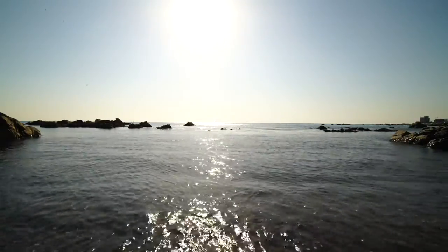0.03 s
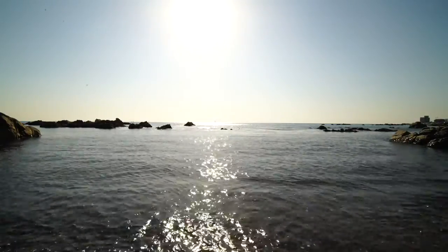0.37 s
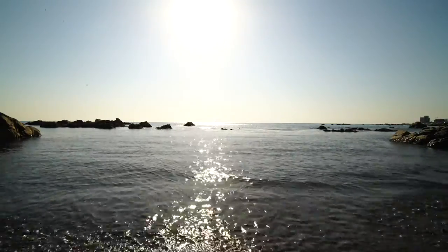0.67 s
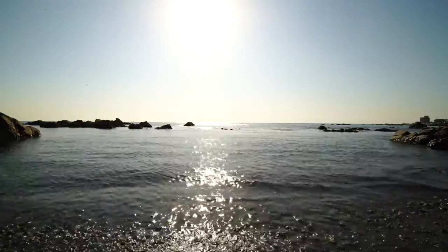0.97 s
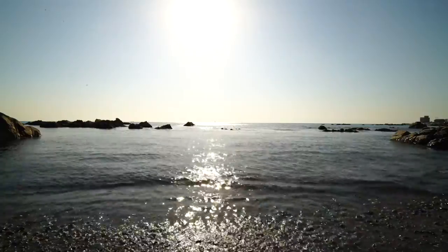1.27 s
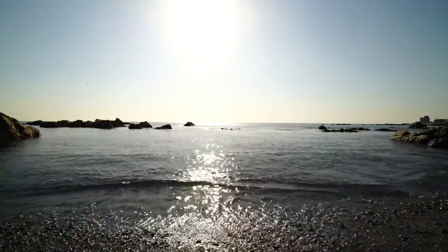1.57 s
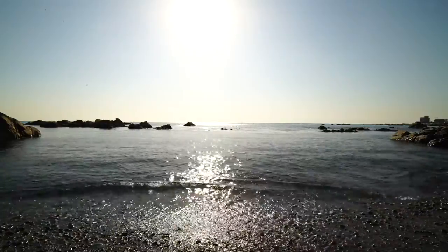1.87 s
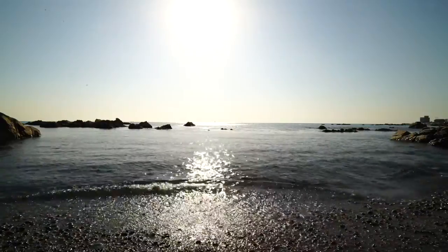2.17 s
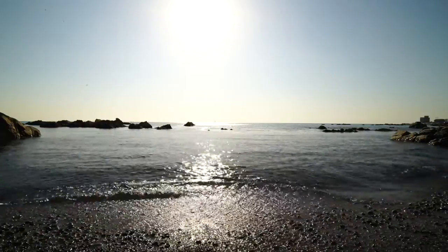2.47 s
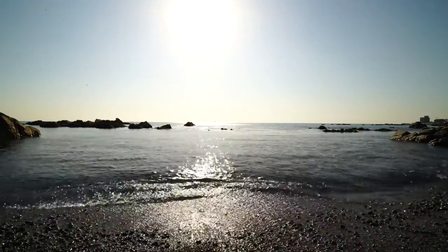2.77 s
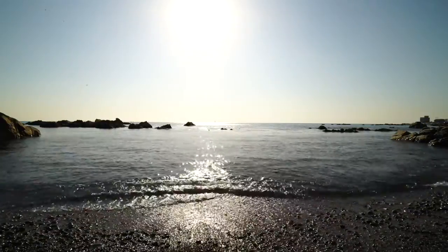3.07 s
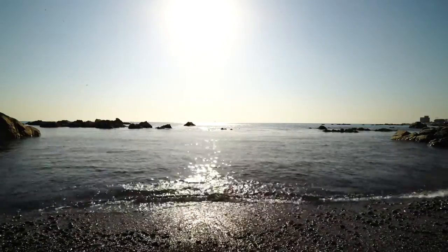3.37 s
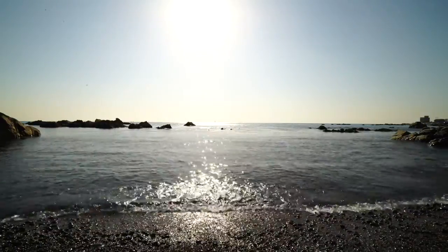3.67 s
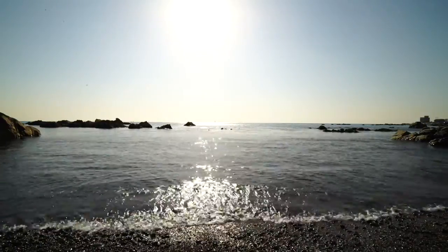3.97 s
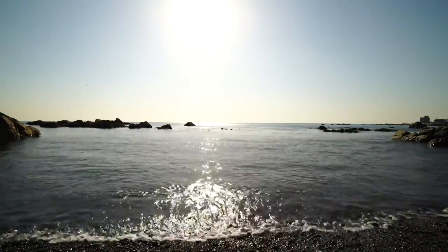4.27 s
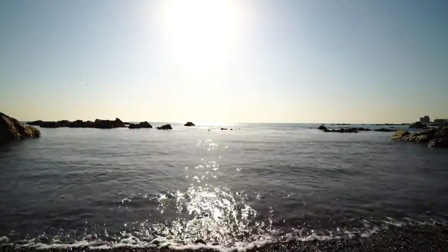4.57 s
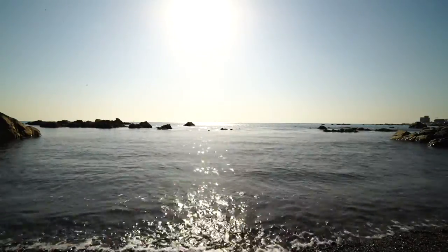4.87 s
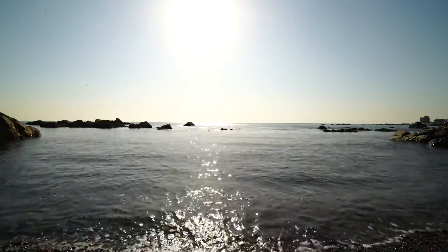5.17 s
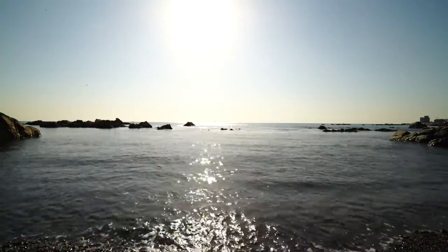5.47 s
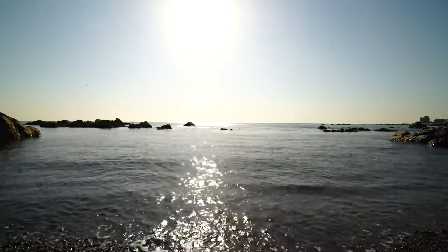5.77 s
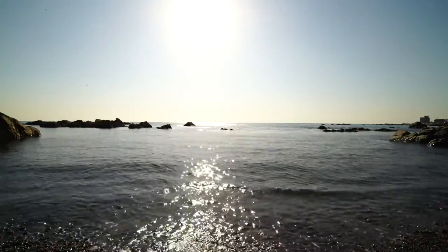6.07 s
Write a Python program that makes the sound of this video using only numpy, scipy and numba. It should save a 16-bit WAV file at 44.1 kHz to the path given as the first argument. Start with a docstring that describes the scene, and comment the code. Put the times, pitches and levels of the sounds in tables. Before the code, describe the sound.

Wind gusts rumble and thump on an outdoor microphone at the edge of a pebble shore, over the steady wash of the sea. A small wave spills faintly, then gurgles build and the next one breaks close by, running up the stones with a foamy hiss. A few pebbles click and bubbles plop. The water drains away softly, and the wind buffets harder at the end.

```python
"""Gusts rumble on the microphone over the wash of the open sea, while small waves reach a pebble shore.
One spills faintly in the distance; the next breaks close by and runs up the stones. The water sounds
by bubble resonance: each pocket of air is a damped oscillator, from deep gulps to the fizz of foam.
Pebbles tick as impacts excite their modes. Wind pops the microphone, and its hardest pushes drive
a limiter."""
import sys
import numpy as np
from scipy import signal
from scipy.fft import rfft, irfft, next_fast_len
from scipy.io import wavfile
from scipy.ndimage import uniform_filter1d, minimum_filter1d
from numba import njit

SR = 44100
rng = np.random.default_rng(int(sys.argv[2]) if len(sys.argv) > 2 else 0)


def transcribe(signal):
    """Save signal, clipped to [-1, 1], as a 16-bit WAV file at the path in sys.argv[1]."""
    frames = np.atleast_2d(signal).T
    limited = np.clip(frames, -1, 1)
    pcm = np.round(limited * 32767).astype(np.int16)
    wavfile.write(sys.argv[1], SR, pcm)


N = 274302

# sea wash and foam hiss as coloured by the microphone, bright near 8 kHz and duller above 10 kHz
# (frequency [Hz], relative density [dB])
SEA_AT_MICROPHONE = [(130, -5), (230, -4), (430, -3.5), (750, -1.5), (1200, -3.5), (2400, -5.5), (4000, -7),
                     (6200, -11.5), (8300, -7), (9400, -11.5), (10600, -17), (13600, -16), (15500, -16)]
FOAM_AT_MICROPHONE = [(2800, -1), (4300, -1), (5200, -1.5), (6300, -3), (8400, -1.5), (9400, -6),
                      (10500, -13.5), (13500, -9.5), (15500, -8.5)]
# spectra of wind and of three bubble sizes (frequency [Hz], relative density [dB])
EDDY_SPECTRUM = [(7, -0.5), (13, 12.5), (24, 2), (36, -8.5), (50, -19.5), (80, -44), (150, -62)]
FLUTTER_SPECTRUM = [(28, -13), (45, 2), (60, 3.5), (75, -7), (100, -10), (150, -19.5), (220, -26),
                    (400, -38), (900, -66)]
PLUNGE_SPECTRUM = [(130, -25), (210, 2.5), (320, 3.5), (520, 5), (680, 1), (1000, -52)]
SPLASH_SPECTRUM = [(350, -16), (540, -6), (700, 0.5), (1000, 2.5), (1430, 1.5), (1720, -3), (2500, -63)]
SWASH_SPECTRUM = [(900, -3.5), (1350, -4.5), (1650, -1), (2400, -1), (3300, -5), (4300, -12), (6000, -20.5),
                  (9000, -34)]
# gusts (start [s], hold [s], eddy level [dB], flutter level [dB])
WIND_GUSTS = [(0, 0.39, -12.5, -27.5), (.52, 0.19, -10.5, -31), (0.776, 0.21, -5, -25.5),
              (1.3, 0.15, -8, -30), (1.52, 0.11, -13.5, -40), (2.066, 0.23, -14.5, -38),
              (2.35, 0.24, -9.5, -33.5), (2.998, 0.26, -14.5, -41), (3.943, 0.73, -13, -30),
              (4.85, 0.44, -20, -32.5), (5.485, 0.054, -15, -30), (5.742, .13, -5.5, -23.5),
              (6.011, 0.17, -3, -18.5)]
# hardest pushes of wind (time [s], pressure over full scale [dB], half-width [s])
PRESSURE_PULSES = [(0.801, 3, 0.008), (0.935, 4.5, 0.012), (1.453, 3.5, 0.016), (4.53, 6.5, 0.019),
                   (6.006, 2.5, 0.01), (6.164, 3, 0.011)]
# pebbles knocked together (time [s], main mode frequency [Hz], main mode level [dB])
PEBBLE_IMPACTS = [(0.537, 2590, -26), (.901, 3900, -29.5), (1.969, 8150, -28), (2.206, 3350, -22),
                  (2.714, 11700, -30), (3.200, 2860, -12), (3.682, 8000, -19), (4.201, 9100, -30),
                  (4.364, 7300, -27), (5.346, 11000, -38)]
# the two rows at 1.4 s are a short pop of wind overloading the microphone; the others are single bubbles
# (time [s], frequency [Hz], level [dB], 60 dB decay time [s])
PLOPS_AND_WIND_POP = [(1.266, 2700, -24, 0.01), (1.401, 870, -26, 0.015), (1.402, 360, -28, .06),
                      (1.593, 1990, -24.5, 0.023), (1.675, 437, -32.5, 0.091), (2.0, 496, -30.5, .12),
                      (2.392, 430, -34, .08), (2.436, 390, -28.5, 0.18), (2.683, 442, -27.5, 0.12),
                      (2.802, 501, -22, .13), (2.825, 670, -24.5, .11), (2.84, 236, -34.5, .15),
                      (2.858, 538, -27, 0.16), (3.094, 910, -15.5, .055), (3.249, 2300, -17, .022),
                      (3.2767, 1350, -10.5, .026), (3.362, 618, -25, .1), (3.625, 250, -22.5, 0.083),
                      (3.732, 855, -18, .11), (3.743, 1356, -16.5, 0.065), (3.977, 1025, -10.5, 0.022),
                      (4.190, 1166, -22, 0.081), (4.455, 2520, -17.5, 0.023), (4.581, 1300, -18.5, 0.038),
                      (4.619, 1900, -23, .04), (5.524, 319, -32.5, 0.19)]
# breaking crests (time [s], strength [dB])
CRESTS = [(1.98, -37.5), (2.84, -35), (3.55, -24.5), (4.45, -40.5), (5.84, -41.5)]
# response of each bubble size to a crest or to the run-up
# (gain [dB], delay [s], rise [dB/s], hold [s], fall [dB/s])
CREST_PLUNGE = (-4.5, -.11, 32.5, 0.1637, 24)
CREST_SPLASH = (0.5, -0.09, 31, 0.05, 17)
CREST_SWASH = (-3.5, -0.0238, 18.5, 0.1845, 22)
CREST_FOAM = (-9, -0.08, 37, .03, 36)
CLIMB_SWASH = (0.5, -0.0061, 19, 0.5, 32.5)
CLIMB_FOAM = (-6.3, -0.06, 57, .07, 23)
# water draining down the shore (start [s], hold [s], plunge [dB], splash [dB], swash [dB], foam [dB])
DRAINS = [(0, .05, -62, -59, -47, -54), (.65, .85, -51.5, -53, -49.5, -52.5),
          (4.7, 0.78, -45.5, -45, -44, -51.5)]
# foam bursting on bare wet stones (start [s], hold [s], level [dB], rise [dB/s], fall [dB/s])
STONE_FIZZ = (2.5, .7, -49, 12, 12)
# resonance of the biggest bubbles (over bare stones [Hz], flooded shore [Hz], strongest crest [Hz])
LOWEST_RESONANCES = (388, 262, 206)

TOP_HZ = 15700
GUST_RISE_DB_S, GUST_FALL_DB_S = 184, 157
BREEZE_EDDY_DB, BREEZE_FLUTTER_DB = -21.5, -42  # between gusts
BARE_S, BARE_LENGTH_S, COVER_DB_S = 1.26, 3.17, 21  # the stones lie bare between two waves
BARE_DB, COVERED_DB = -28, -39  # their ticks in air and under water
PLOP_GLIDE_OCT_S = 4.3
RUN_UP_S, RUN_UP_DB = 3.835, -28.5  # the largest wave reaches the stones
DRAIN_RISE_DB_S, DRAIN_FALL_DB_S = 30, 14.5


def undb(db):
    """Amplitude grows tenfold for every 20 dB."""
    return 10 ** (np.asarray(db) / 20)


def unit(x):
    """Normalisation to rms 1."""
    return x / np.sqrt(np.mean(x ** 2))


def power_sum(gains):
    """Incoherent addition: unrelated sounds add in power."""
    return np.sqrt(sum(g ** 2 for g in gains))


def at(curve, s):
    """Linear interpolation of a control curve at the times `s`."""
    return np.interp(s * SR, np.arange(N), curve)


def walk(rate):
    """Random modulation with spread near 1, taking `rate` new values a second."""
    steps = rng.standard_normal(4096)
    return np.interp(np.arange(N) / SR * rate, np.arange(len(steps)), steps) * np.sqrt(3 / 2)


def swell(start, hold, db, rise_db_s, fall_db_s):
    """Exponential growth to `db` at `start`, a hold, then exponential decay."""
    t = np.arange(N) / SR - start
    return undb(db - rise_db_s * np.maximum(-t, 0) - fall_db_s * np.maximum(t - hold, 0))


def colour(x, spectrum):
    """Linear filtering imposes a band-limited spectrum; the result has rms 1."""
    hz, db = np.transpose(spectrum)
    f = np.maximum(np.fft.rfftfreq(2 * N, 1 / SR), 1)
    gain = undb(np.interp(np.log(f), np.log(hz), db, left=-120, right=-120))
    size = next_fast_len(N + 8192)
    gain = np.interp(np.fft.rfftfreq(size, 1 / SR), f, gain)
    return unit(irfft(rfft(x, size) * gain, size)[:N])


@njit
def ring(start, hz, t60, size, glide):
    """Damped oscillators in free decay, each rising by `glide` octaves as it dies."""
    out = np.zeros(N)
    for k in range(len(start)):
        first, length = int(start[k] * SR), int(t60[k] * SR) + 2
        turn = 2 * np.pi * hz[k] / SR
        pole = np.exp(1j * turn - np.log(1000) / length)
        bend = np.exp(1j * turn * (2 ** glide[k] - 1) / length)
        phasor = size[k] + 0j
        for i in range(max(first, 0), min(first + length, N)):
            phasor *= pole
            pole *= bend
            out[i] += phasor.imag
    return out


def excitation(events, response):
    """Gain of one bubble size: its responses to the events (time [s], strength [dB]) add in power."""
    gain_db, delay, rise, hold, fall = response
    return power_sum(swell(s + delay, hold, db + gain_db, rise, fall) for s, db in events)


def bareness():
    """Exposure of the stones: 1 while bare, falling exponentially toward 0 under water."""
    return swell(BARE_S, BARE_LENGTH_S, 0, COVER_DB_S, COVER_DB_S)


def biggest_bubble_hz():
    """Resonance falls with size: deeper water and harder crests trap bigger, lower bubbles."""
    thin_hz, flooded_hz, deep_hz = LOWEST_RESONANCES
    calm_hz = flooded_hz * (thin_hz / flooded_hz) ** bareness()
    crest = excitation(CRESTS, CREST_PLUNGE)
    return calm_hz * (deep_hz / calm_hz) ** (crest / crest.max())


def bubble_cloud(low_hz, high_hz, cycles, spread_db, glide, blur, count):
    """Superposed bubble resonances, a few of them strong; noise (`blur`) stands for the faintest."""
    when, pitch, luck, damping, rise = rng.random((count, 5)).T
    s = when * N / SR
    hz = np.minimum(low_hz * (high_hz / low_hz) ** pitch, TOP_HZ)
    t60 = cycles * (.5 + damping) / hz
    size = undb(-spread_db * np.log(1 - .99 * luck))
    size /= np.sqrt(1 + (at(biggest_bubble_hz(), s) / hz) ** 10)  # bubbles too big to trap fade out
    rings = ring(s, hz, t60, size * np.sqrt(hz), 2 * glide * rise)
    return unit(rings) + blur * rng.standard_normal(N)


def sea():
    """Ripples all along the shore add incoherently into an even wash, coloured by the microphone."""
    wash = bubble_cloud(199, 15760, cycles=11.7, spread_db=3.5, glide=0.21, blur=1.0, count=30000)
    return colour(wash, SEA_AT_MICROPHONE) * undb(-42.5 + .5 * walk(6))


def wind():
    """Turbulent pressure on the microphone: slow eddies heave, quick ones flutter, pushes overload."""
    eddy_gains, flutter_gains = [undb(BREEZE_EDDY_DB)], [undb(BREEZE_FLUTTER_DB)]
    for start, hold, eddy_db, flutter_db in WIND_GUSTS:
        gust = swell(start, hold, 0, GUST_RISE_DB_S, GUST_FALL_DB_S)
        eddy_gains.append(gust * undb(eddy_db))
        flutter_gains.append(gust * undb(flutter_db))
    eddies = colour(rng.standard_normal(N), EDDY_SPECTRUM)
    flutter = colour(rng.standard_normal(N), FLUTTER_SPECTRUM)
    # eddies within one gust are of like strength
    eddies /= np.sqrt(uniform_filter1d(eddies ** 2, size=5000))
    flutter /= np.sqrt(uniform_filter1d(flutter ** 2, size=4000))
    t = np.arange(N) / SR
    pushes = sum(undb(db) * np.exp(-((t - s) / width) ** 2) for s, db, width in PRESSURE_PULSES)
    eddies /= 1 + pushes ** 2  # a hard push sweeps the slow eddies aside
    return eddies * power_sum(eddy_gains) + flutter * power_sum(flutter_gains) + pushes


def rolling_db(s):
    """Transmission loss: the level of the strongest ticks drops while water covers the stones."""
    gain = power_sum([undb(BARE_DB) * bareness(), undb(COVERED_DB)])
    return 20 * np.log10(at(gain, s))


def trickle(count):
    """Air entrainment: water draining between the stones sheds small bubbles, three at a time."""
    when, pitch = np.repeat(rng.random((count, 2)), 3, axis=0).T
    lag, detune, luck = rng.random((len(when), 3)).T
    s = when * N / SR + 0.016 * lag
    hz = 1250 * 2 ** (1.6 * pitch + 0.29 * detune)
    db = rolling_db(s) - 1.5 - 13 * (1 - luck ** 2)
    return ring(s, hz, t60=42 / hz, size=undb(db), glide=0.34 * luck)


def pebbles(count):
    """Impacts excite short-lived modes in rolling stones: a few clicks amid `count` small ticks."""
    knock_s, knock_hz, knock_db = np.transpose(PEBBLE_IMPACTS)
    when, pitch, luck = rng.random((count, 3)).T
    tick_s = when * N / SR
    s = np.append(knock_s, tick_s)
    hz = np.append(knock_hz, 2400 * 2 ** (2 * pitch))
    db = np.append(knock_db, rolling_db(tick_s) - 13 * (1 - luck ** 3))
    t60 = np.full(len(s), .006)
    # (frequency ratio [1], level [dB])
    modes = [(.56, -29), (.8, -14), (1, 0), (1.24, -10.5), (1.55, -15)]
    return sum(ring(s, hz * ratio, t60, undb(db + mode_db), glide=0 * s) for ratio, mode_db in modes)


def plops_and_wind_pop():
    """Damped ringing voices bubbles, rising in pitch near the surface, and one pop of wind overload."""
    s, hz, db, t60 = np.array(PLOPS_AND_WIND_POP).T.copy()
    glide = PLOP_GLIDE_OCT_S * t60
    out = ring(s, hz, t60, undb(db), glide)
    for lag, detune in rng.random((3, 2, len(s))):  # three brief rings roughen each onset
        out += ring(s + .008 * lag, hz * (0.76 + 0.66 * detune), 0.4 * t60, undb(db - 9), glide)
    return out


def surf_gains():
    """The stages of a wave add in power, giving the gains of plunge, splash, swash and foam."""
    run_up = [(RUN_UP_S, RUN_UP_DB)]
    responses = (CREST_PLUNGE, CREST_SPLASH, CREST_SWASH, CREST_FOAM)
    breaking = [excitation(CRESTS, response) for response in responses]
    climbing = [0, 0, excitation(run_up, CLIMB_SWASH), excitation(run_up, CLIMB_FOAM)]
    draining = power_sum(np.outer(undb(levels_db), swell(s, hold, 0, DRAIN_RISE_DB_S, DRAIN_FALL_DB_S))
                         for s, hold, *levels_db in DRAINS)
    left_behind = [0, 0, 0, swell(*STONE_FIZZ)]
    return [power_sum(stages) for stages in zip(breaking, climbing, draining, left_behind)]


def surf():
    """Bubble resonance: big ones gulp as a crest falls; small ones and foam carry on up the stones."""
    plunge_gain, splash_gain, swash_gain, foam_gain = surf_gains()
    slosh = walk(21.844) + walk(75)  # uneven slaps of water stir all sizes at once
    plunge = bubble_cloud(179.3, 883, cycles=26, spread_db=3.0, glide=0.096, blur=0.43, count=3200)
    splash = bubble_cloud(445, 2180, cycles=27, spread_db=3.0, glide=0.24, blur=0.89, count=9000)
    swash = bubble_cloud(1115, 6390, cycles=24, spread_db=1.16, glide=0.12, blur=0.9, count=15000)
    foam = bubble_cloud(3580, 13200, cycles=17, spread_db=2.0, glide=.05, blur=0.88, count=20000)
    return (colour(plunge, PLUNGE_SPECTRUM) * plunge_gain * undb(0.33 * slosh)
            + colour(splash, SPLASH_SPECTRUM) * splash_gain * undb(0.62 * slosh)
            + colour(swash, SWASH_SPECTRUM) * swash_gain * undb(0.46 * slosh)
            + colour(foam, FOAM_AT_MICROPHONE) * foam_gain * undb(1.1 * slosh))


def scene():
    """Superposition of shore, sea and wind at one microphone."""
    return (surf() + plops_and_wind_pop() + pebbles(count=460) + trickle(count=90) + sea() + wind())[None]


def record(dry):
    """Peak limiting ducks everything under the hardest pushes; filters cut both ends of the band."""
    ceiling = .95
    needed = np.minimum(1, ceiling / (np.abs(dry) + 1e-9))
    held = minimum_filter1d(needed, size=1100)
    gain = uniform_filter1d(held, size=500)
    highpass = signal.butter(1, 9, "high", fs=SR, output="sos")
    lowpass = signal.ellip(10, .2, 80, TOP_HZ, fs=SR, output="sos")
    return signal.sosfilt(lowpass, signal.sosfilt(highpass, dry * gain))


dry = scene()
out = record(dry)
transcribe(out)
```